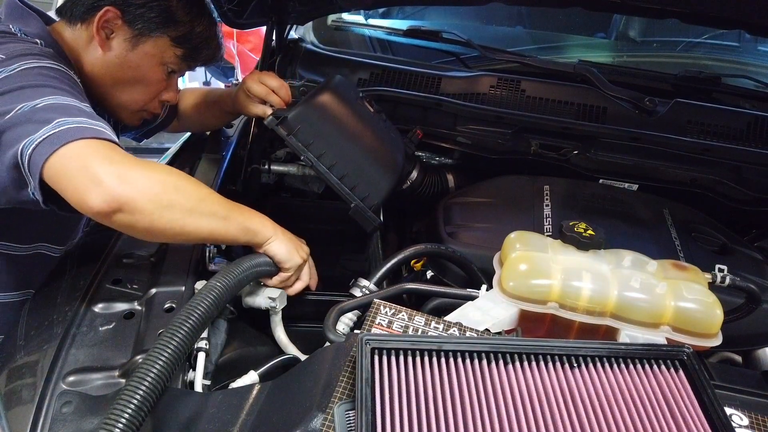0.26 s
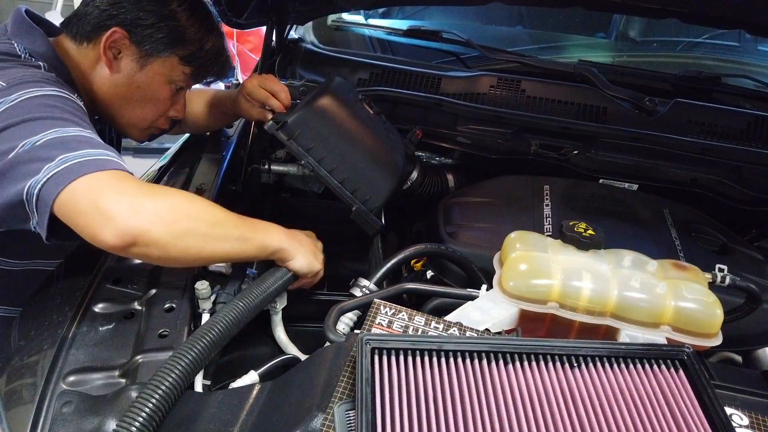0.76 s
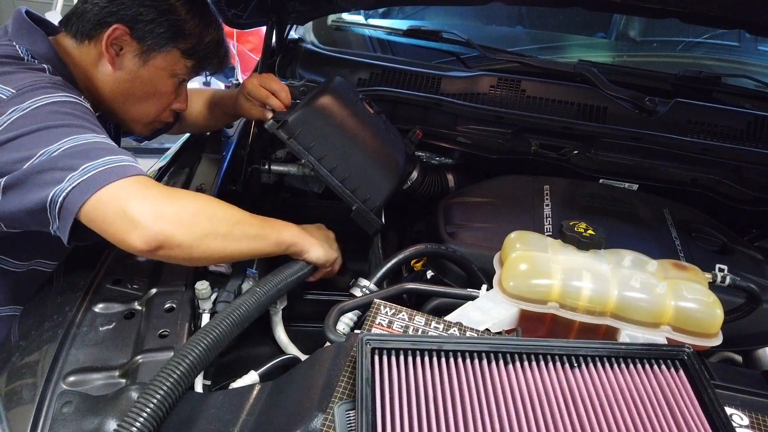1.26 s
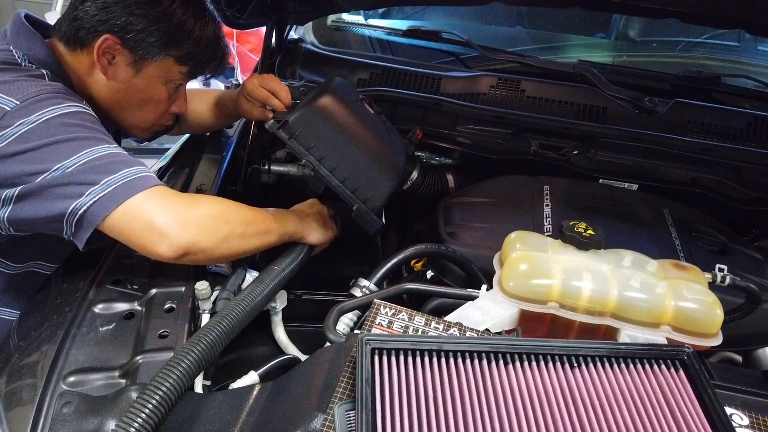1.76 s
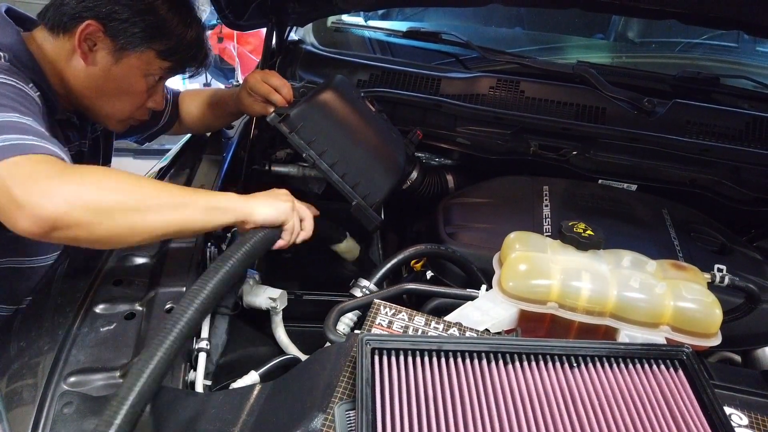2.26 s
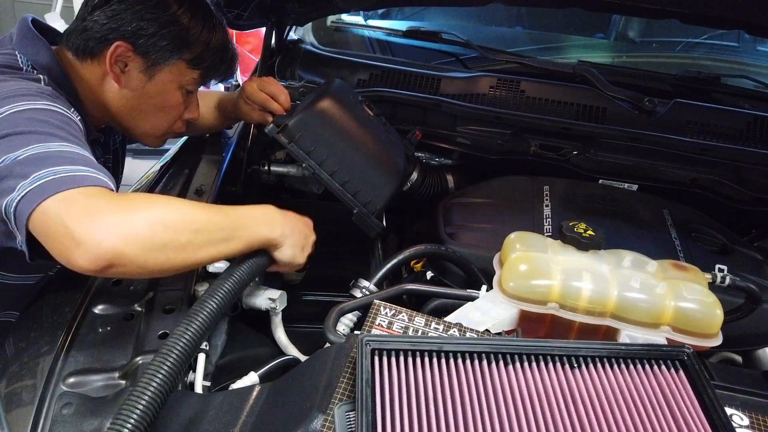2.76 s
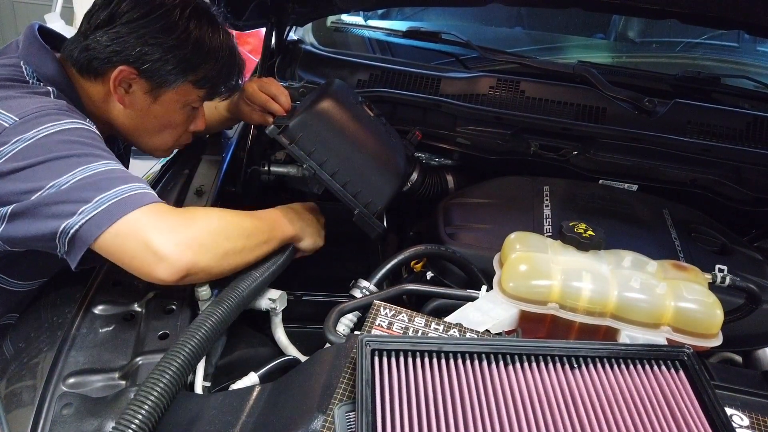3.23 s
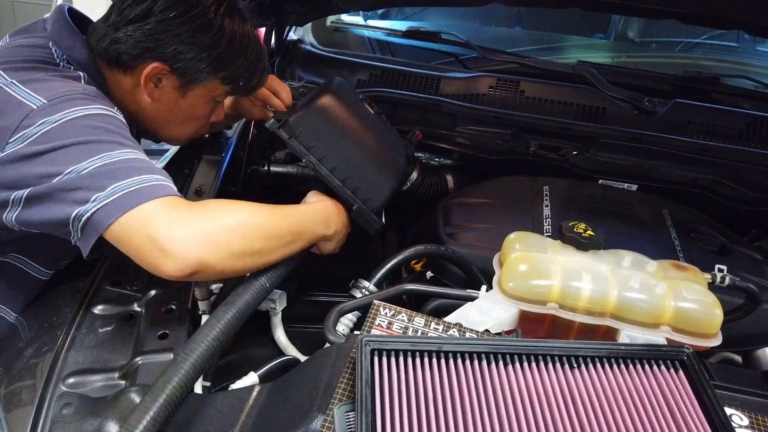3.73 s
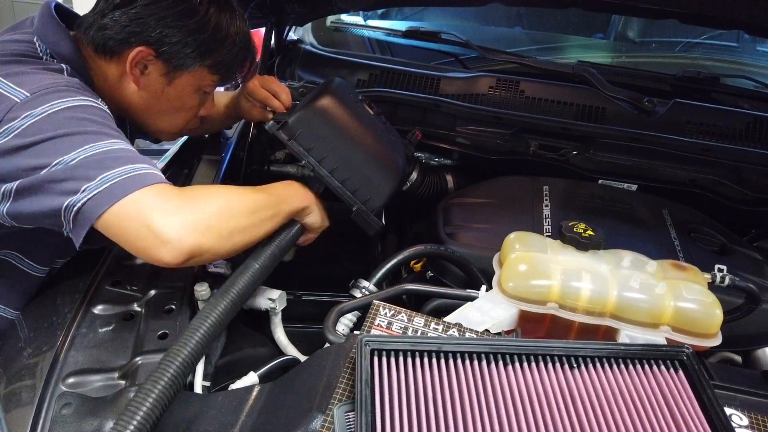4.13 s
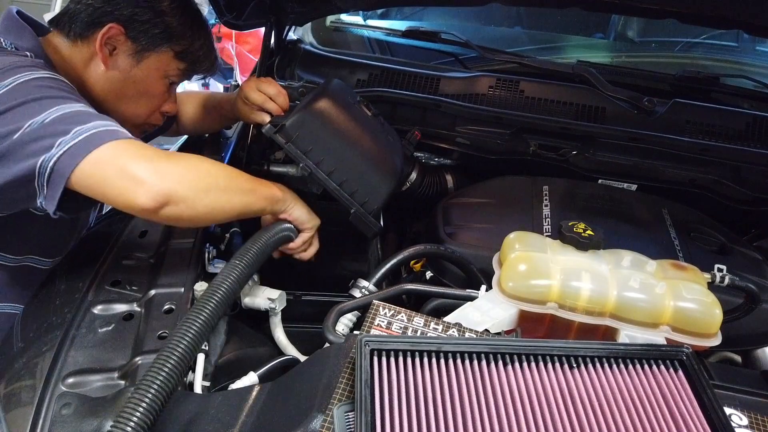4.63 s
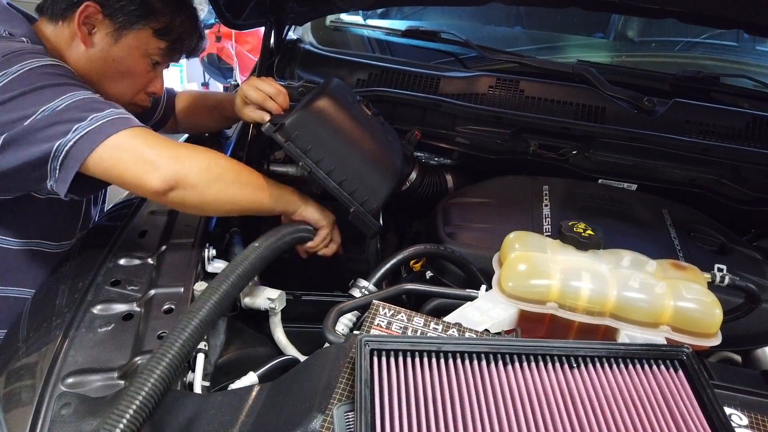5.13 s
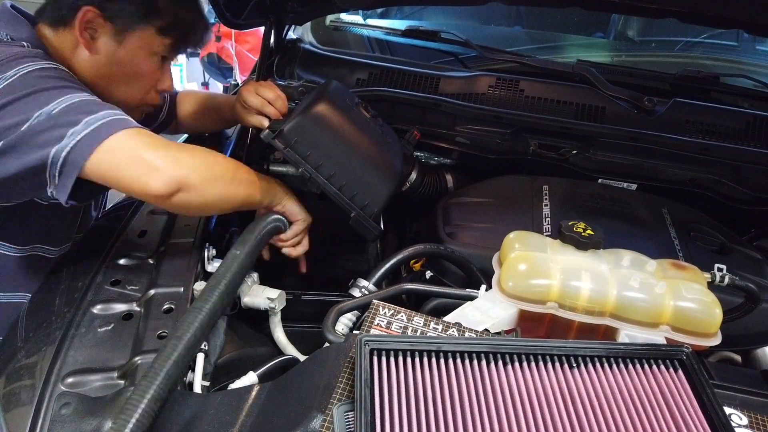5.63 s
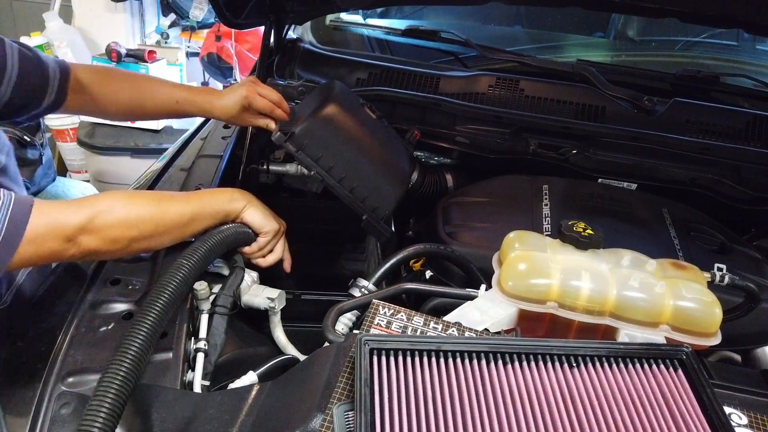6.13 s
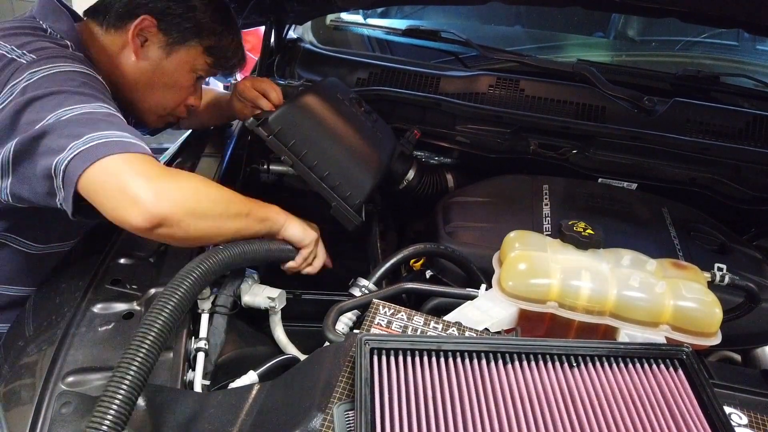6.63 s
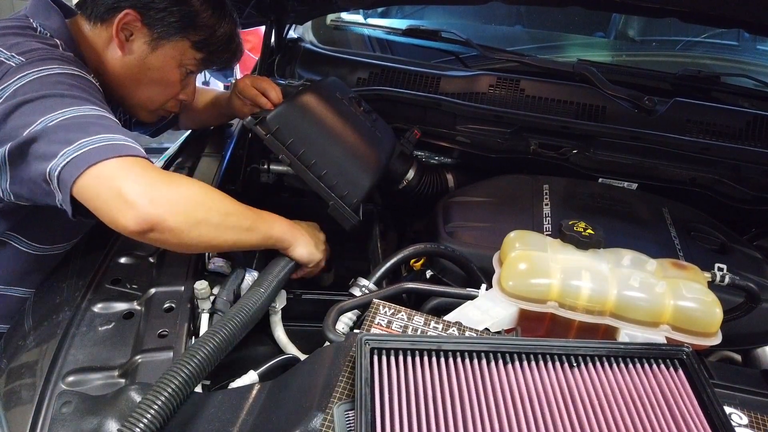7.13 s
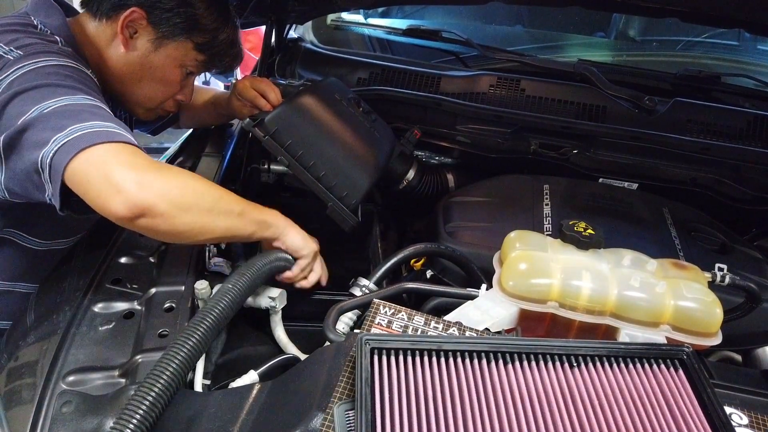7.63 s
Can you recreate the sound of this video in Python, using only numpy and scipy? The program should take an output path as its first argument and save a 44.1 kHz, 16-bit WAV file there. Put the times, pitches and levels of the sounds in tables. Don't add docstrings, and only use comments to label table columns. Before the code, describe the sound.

A vacuum cleaner runs continuously a few metres away, a fixed high whine over roaring air. Close to the microphone, its nozzle knocks and scrapes a hard plastic housing in an engine bay, while sharp hisses and brief airy whistles flare as the gap narrows. The hose rumbles and thumps softly. Handling is busy until about six seconds, pauses, then resumes near the end.

```python
import sys
import numpy as np
from scipy import signal
from scipy.fft import rfft, irfft, next_fast_len
from scipy.io import wavfile
from scipy.ndimage import uniform_filter1d

SR = 44100
rng = np.random.default_rng(int(sys.argv[2]) if len(sys.argv) > 2 else 0)


def natural_amplitude(level_db):
    exponent = np.asarray(level_db, float) / 20
    return 10 ** exponent


def wav_record(signal):
    frames = np.transpose(np.atleast_2d(signal))
    bounded = np.clip(frames, -1, 1)
    quanta = np.round(bounded * 32767).astype(np.int16)
    wavfile.write(sys.argv[1], SR, quanta)


N = 347949
T, M = np.arange(N) / SR, next_fast_len(N)
HZ = np.arange(M // 2 + 1) * SR / M + 1e-3

# start_s, blade_tone_db, nozzle_hiss_db
MACHINE_LEVELS = [(0.0, -27, -36.5), (0.61, -27, -35.5), (1.12, -32.5, -38), (1.38, -33, -39.5),
                  (1.69, -33.5, -33), (1.91, -34, -39), (2.2, -31.5, -40.5), (2.61, -26.5, -37),
                  (2.9, -33.5, -39.5), (3.25, -34.5, -38), (3.67, -30, -39), (3.89, -28.5, -40),
                  (5.1, -29.5, -36.5), (5.36, -32, -38.5), (5.69, -31, -39.5), (6.9, -27.5, -34.5),
                  (7.43, -36.5, -37), (7.89, -33, -41)]
BLADE_HZ = 1875
# pitch_hz, width_hz, level_db
CASING_MODES = [(929, 63, -7.5), (1077, 80, -4), (1204, 105, 0), (1309, 40, 1.5), (1461, 80, -2.5),
                (1693, 18, -1), (1780, 70, 2), (1851, 47, 2.5), (2087, 42, -6), (2330, 55, 1),
                (2522, 95, 1.5), (3116, 200, -6), (3343, 69, 4.5), (3518, 31, 3.5), (3690, 82, -5),
                (4240, 75, -12)]
# pitch_hz, level_db (per Hz)
ROAR_COLOUR = [(600, -27), (1000, -15), (1800, -11), (2000, -11.5), (2700, -4.5), (2920, -13.5),
               (3600, -36), (4500, -43), (6000, -69)]

# pitch_hz, level_db (per Hz)
RUMBLE_COLOUR = [(20, -17), (50, -16.5), (100, -12), (180, -4), (290, -7), (356, -12.5), (500, -5.5),
                 (750, -8), (1000, -17.5), (1300, -34)]
# pitch_hz, width_hz, level_db
HOSE_MODES = [(226, 9.7, 5.6), (439.3, 10.4, 12.2), (539.4, 10.3, 10.5), (650, 57, 5.6), (1010, 20, 4.4)]
# start_s, peak_db, pitch_hz
HOSE_THUMPS = [(0.347, -48, 317), (0.727, -38, 220), (1.127, -32.5, 203), (1.358, -39, 188),
               (1.479, -29.5, 198), (2.099, -36, 258), (2.396, -39, 196), (2.676, -34, 226),
               (2.976, -31.5, 184), (3.19, -29.5, 220), (3.442, -40, 199), (3.695, -36, 167),
               (3.97, -29.5, 199), (4.364, -41, 191), (4.849, -33, 288), (5.049, -28, 280),
               (5.198, -35, 325), (5.459, -29.5, 332), (5.755, -32, 278), (5.886, -31.5, 398),
               (7.219, -40, 153)]
# start_s, length_s, first_hz, last_hz, level_db
RIB_HUMS = [
    (0.026, 0.49, 439.4, 440, -46.5),
    (1.054, 0.19, 302.6, 285, -49.5),
    (1.644, 0.25, 435, 459, -47),
    (4.835, 0.16, 290, 278, -38.5),
    (5.95, 0.44, 194.6, 194, -47.5),
]

# pitch_hz, level_db (per Hz)
HISS_COLOUR = [(2060, -49), (3500, 2), (4230, -7), (4680, -2), (6290, -6.5), (7370, -4.5), (8800, -7.5),
               (12300, -4), (13700, -10), (14500, -4), (15800, -25)]
# pitch_hz, width_hz, level_db
NOZZLE_MODES = [(5660, 280, -0.5), (6060, 48, -6), (7300, 91, 4.5), (7860, 150, 2), (9350, 140, 5),
                (10670, 540, 0), (12400, 130, -16)]
JET_RANGES = [5200, 6600, 8300, 10600, 13200]
# start_s, length_s, level_db, bright_minus_dull_db
SLAP_GUSTS = [(0.116, 0.054, -32.5, 3), (0.627, 0.02, -32, 12), (0.649, 0.074, -36.5, 4),
              (0.945, 0.056, -30, 1.5), (1.105, 0.1, -34.5, 5), (1.233, 0.051, -31, 1),
              (1.452, 0.027, -23.5, 4.5), (1.795, 0.036, -34, 11), (1.833, 0.028, -30, 2),
              (1.905, 0.037, -28, 3), (2.607, 0.035, -28.5, 11), (2.857, 0.044, -33, 4),
              (3.065, 0.06, -32, 1), (3.125, 0.053, -34.5, 5.5), (3.256, 0.1, -35, 5),
              (3.446, 0.025, -30, 2.5), (3.702, 0.036, -28, 1.5), (3.973, 0.091, -28.5, 8),
              (4.108, 0.045, -26.5, 2.5), (4.183, 0.086, -31, 4), (4.483, 0.065, -35.5, 7),
              (5.204, 0.085, -35, 1.5), (5.462, 0.016, -29.5, -7), (5.485, 0.04, -31, 4),
              (6.701, 0.015, -28, -22), (7.043, 0.064, -27, 0.5), (7.102, 0.031, -32, 4),
              (7.136, 0.041, -34, 4), (7.528, 0.15, -33.5, 3.5)]
# start_s, length_s, level_db, bright_minus_dull_db
SLIDE_GUSTS = [(0.758, 0.046, -32, -1), (0.851, 0.022, -30.5, 3), (1.011, 0.069, -31.5, 5),
               (1.331, 0.056, -33.5, 4), (1.508, 0.1, -28, 3.5), (1.625, 0.072, -28, 3),
               (2.35, 0.042, -38.5, -5), (2.501, 0.051, -35, 7), (2.689, 0.07, -30, 2),
               (2.941, 0.015, -30.5, 7), (3.19, 0.05, -35, 5.5), (3.413, 0.028, -28.5, 2.5),
               (3.57, 0.05, -35.5, 8), (4.324, 0.039, -30, 2), (4.426, 0.053, -28, 2.5),
               (4.728, 0.038, -31.5, 33), (5.406, 0.053, -27.5, 4.5), (5.527, 0.016, -29.5, 1),
               (7.18, 0.026, -29.5, 6), (7.294, 0.028, -31, 3), (7.394, 0.044, -31, 1)]
SLAP_PEAK, SLIDE_PEAK = 0.05, 0.55

# start_s, wall_db, lid_db, rim_db, tip_db
NOZZLE_TAPS = [(0.069, -30, -16.5, -24, -20), (0.1232, -23, -33, -26, -31), (0.203, -30, -28, -31, -27),
               (0.509, -21, -38, -21.5, -26), (0.644, -37, -23, -33, -23), (0.67, -32, -20, -22, -19.5),
               (0.6835, -28, -23, -29, -24), (0.6947, -36, -28, -33, -21), (0.7242, -26, -14.5, -33, -29),
               (0.783, -40, -39, -31, -24), (0.798, -36, -39, -38, -22), (0.8571, -37, -21, -34, -30),
               (1.1124, -19, -15.5, -22.5, -32), (1.188, -28, -26, -39, -30), (1.2176, -28, -34, -28, -25),
               (1.2427, -27, -14.5, -24, -21), (1.2684, -25, -30, -27, -30), (1.3337, -28, -33, -37, -27),
               (1.364, -20.5, -29, -27, -25), (1.4577, -44, -25, -29, -26), (1.5139, -36, -31, -29, -19),
               (1.638, -40, -33, -24, -31), (1.7367, -43, -33, -36, -30), (1.8001, -40, -27, -16, -12.5),
               (2.2463, -22, -32, -32, -41), (2.276, -28, -28, -34, -36), (2.6394, -33, -42, -31, -33),
               (2.677, -37, -26, -40, -43), (2.6968, -22, -21, -18, -23), (2.8615, -15.5, -30, -19.5, -20),
               (2.8685, -22, -23, -37, -26), (3.0003, -27, -25, -35, -31), (3.111, -24.5, -32, -43, -35),
               (3.348, -27, -33, -40, -33), (3.427, -41, -46, -31, -28), (3.6529, -30, -28, -25, -25),
               (4.113, -22, -35, -30, -36), (4.1913, -27, -27, -26, -26), (4.3326, -29, -18, -32, -43),
               (4.3646, -27, -14, -28, -26),
               (4.4177, -32, -22, -32, -24), (4.4404, -42, -26, -41, -22), (4.4535, -42, -40, -40, -22),
             (4.494, -23, -27, -26, -16), (4.5649, -45, -32, -26.5, -23), (4.6873, -33, -31, -28, -28),
             (4.7361, -22, -38, -41, -37), (4.8413, -42, -27, -25, -27), (5.0469, -32, -24, -26, -26),
             (5.0584, -41, -29, -30, -32), (5.122, -33, -34, -37, -26), (5.1524, -19, -31, -16, -17),
             (5.1614, -30, -35, -21, -24), (5.1978, -39, -21, -25, -20.5), (5.4193, -25, -33, -26, -25),
             (5.4452, -21, -24, -25, -23), (5.4552, -28, -21, -31, -30), (5.4726, -20, -26, -25, -27),
             (5.4934, -30, -36, -29, -25), (5.5036, -33, -28, -38, -33), (5.5159, -26, -32, -32, -25),
             (5.5343, -36, -23, -34, -36), (5.8459, -23, -22, -23, -27), (5.88, -30, -35, -34, -26),
             (5.9483, -30, -31, -29, -26), (6.7032, -31, -33, -25, -24), (6.7642, -36, -27, -29, -29),
             (6.8884, -25, -29, -20.5, -20), (7.0476, -27, -30, -24, -26), (7.0569, -26, -33, -31, -26),
             (7.115, -21, -27, -25, -23), (7.1471, -30, -21, -27, -25), (7.1837, -24, -20.5, -27, -23),
             (7.2317, -32, -19.5, -35, -27), (7.2582, -41, -21, -42, -41), (7.4044, -49, -34, -41, -26),
             (7.4223, -47, -46, -43, -29), (7.6599, -37, -14.5, -21, -23), (7.6676, -25, -23, -24, -33),
             (7.8028, -44, -22, -30, -25),
               (0.6365, -34, -26, -28, -27), (1.2365, -24, -22, -32, -23), (1.437, -25, -32, -35, -36),
                 (1.8442, -36, -34, -25, -29), (2.5471, -36, -26, -31, -37), (2.611, -26, -34, -36, -33),
                 (3.1906, -38, -36, -32.5, -25), (3.701, -32, -32, -26, -33), (4.3085, -26, -24, -38, -38),
                 (4.36, -32, -20, -25, -34), (4.4054, -35, -27, -32, -36), (7.7458, -34, -36, -27, -30),
                 (7.881, -38, -36, -32.5, -29)]
# start_s, peak_db
BOX_KNOCKS = [(0.6696, -24), (0.6835, -33), (0.6947, -41), (1.1124, -38), (1.2422, -42), (1.4577, -31),
              (1.6373, -37), (1.8005, -32), (2.2471, -33), (2.2755, -42), (2.6405, -26), (2.6968, -24.5),
              (2.8616, -45), (3.3473, -31.5), (4.494, -32), (4.5649, -36), (4.8413, -22), (5.0469, -27),
              (5.0584, -31), (5.1614, -27.5), (5.4726, -36), (5.8459, -27.5), (5.88, -33), (5.9483, -28),
              (6.8884, -34), (7.0476, -30), (7.0569, -33), (7.115, -30), (7.6599, -32), (7.6676, -36),
              (7.8028, -31)]
# pitch_hz, level_db, fade_by_60_db_s
BOOM_MODES = [(580, -12, 0.05), (766, -9, 0.05), (940, -4, 0.045)]
# pitch_hz, level_db, fade_by_60_db_s
WALL_MODES = [(1284, -18, 0.05), (1500, -11, 0.045), (1640, -4, 0.055)]
# pitch_hz, level_db, fade_by_60_db_s
LID_MODES = [(2070, -9, .02), (2350, -6, .02), (2560, 1, .03)]
# pitch_hz, level_db, fade_by_60_db_s
RIM_MODES = [(3110, 0, .013), (3500, 1, .014), (3850, 1, .013), (4300, -2, .011)]
# pitch_hz, level_db, fade_by_60_db_s
TIP_MODES = [(4800, -5, .009), (5300, -1, .011), (5750, 2, .013), (6300, -4, .008), (7300, -7, .006),
             (9500, -9, .004), (12000, -11, .003)]
RATTLE_S = 0.0045

# start_s, length_s, pitch_hz, level_db
GAP_WHISTLES = [(0.123, 0.073, 13400, -31), (0.762, 0.047, 5100, -29), (0.855, 0.025, 8120, -43),
                (0.943, 0.048, 11000, -33), (1.02, 0.068, 10650, -38), (1.23, 0.056, 7880, -43),
                (1.33, 0.061, 5760, -38), (1.453, 0.036, 12350, -37), (1.63, 0.096, 10810, -31),
                (1.795, 0.024, 9900, -31), (1.907, 0.037, 12270, -38), (2.509, 0.047, 10800, -33),
                (2.609, 0.049, 11670, -32), (2.695, 0.072, 10640, -33), (2.857, 0.051, 11000, -39),
                (3.05, 0.069, 8000, -34), (3.188, 0.026, 10510, -34), (3.261, 0.062, 10910, -40),
                (3.577, 0.049, 13160, -40), (3.697, 0.046, 10200, -26), (4.106, 0.05, 10300, -29.5),
                (4.187, 0.07, 5400, -36), (4.327, 0.046, 8300, -36), (4.43, 0.048, 5580, -28.5),
                (4.489, 0.022, 5680, -35), (5.418, 0.048, 5760, -32), (5.645, 0.023, 12500, -34),
                (6.958, 0.049, 7960, -33.5), (7.141, 0.023, 12250, -39), (7.3, 0.026, 10730, -40),
                (7.401, 0.035, 5640, -34), (7.656, 0.027, 5800, -35)]
WHISTLE_WIDTH = 0.047
# start_s, length_s, level_db, wall_against_lid_db
RIB_SCRAPES = [(0.653, 0.083, -29.5, 1), (1.175, 0.14, -33.5, 7), (1.433, 0.034, -32, 10),
               (2.228, 0.093, -38, -7), (2.619, 0.12, -33, -6), (4.076, 0.05, -34.5, 2),
               (4.3, 0.24, -42.5, -21), (4.716, 0.063, -32, 18), (5.035, 0.053, -29, 1),
               (5.426, 0.098, -29.5, 7), (5.84, 0.18, -34.5, 1), (7.046, 0.27, -37, 22),
               (7.792, 0.072, -34.5, 6)]
# pitch_hz, side_minus_mid_db
PORT_DIFFERENCE = [(30, -1), (60, -5), (125, -6), (300, -9), (480, -18), (700, -34), (1600, -30),
                   (1870, -15), (2200, -28), (6300, -24), (8500, -10), (12500, -3), (15000, -3)]


def curve(points):
    hz, db = np.transpose(points)
    return natural_amplitude(np.interp(np.log(HZ), np.log(hz), db))


def peaks(modes):
    return np.sqrt(sum(natural_amplitude(2 * db) / (1 + (2 * (HZ - hz) / width) ** 2) ** 2 for hz, width, db in modes))


def air(gain, lo_hz, hi_hz):
    power = np.sum(gain[(HZ > lo_hz) & (HZ < hi_hz)] ** 2) * 4 / M ** 2
    chance = rng.standard_normal((2, len(HZ), 2)).view(complex)[..., 0]
    return irfft(chance * gain, M)[:, :N] / np.sqrt(power)


def walk(rate):
    k = int(SR / rate)
    held = np.repeat(rng.standard_normal(N // k + 1), k)
    return 1.247 * uniform_filter1d(uniform_filter1d(held, k), k)[:N]


def add(out, s, sound):
    i = max(int(s * SR), 0)
    out[..., i:i + sound.shape[-1]] += sound[..., :N - i]


def fan(tone_db, shade_db):
    quarter_turn = np.array([[0], [np.pi / 2]])
    phase = 2 * np.pi * np.cumsum(BLADE_HZ + 1.553 * walk(7.2)) / SR + quarter_turn
    tone = natural_amplitude(1.6 * walk(55)) * np.sin(phase) + natural_amplitude(-24) * np.sin(2 * phase)
    colour = np.hypot(curve(ROAR_COLOUR), peaks(CASING_MODES))
    lower = air(colour * (HZ < 2200), 1106, 1425) * natural_amplitude(-5.0 + 2.0 * walk(22))
    middle = air(colour * (HZ > 2200) * (HZ < 2900), 2200, 3700) * natural_amplitude(-6.5 + 1.2 * walk(16))
    upper = air(colour * (HZ > 2900), 2200, 3600) * natural_amplitude(-6.0 + 2.05 * walk(17))
    return np.sqrt(2) * natural_amplitude(tone_db) * tone + natural_amplitude(shade_db) * (lower + middle + upper)


def hose(rumble_db):
    colour = curve(RUMBLE_COLOUR) * np.hypot(1, peaks(HOSE_MODES))
    out = air(colour, 110, 655) * natural_amplitude(rumble_db + 3.0 + 2.0 * walk(6.5))
    t = np.arange(int(.15 * SR)) / SR
    no_bass = signal.butter(2, 130, "high", fs=SR, output="sos")
    for s, db, hz in HOSE_THUMPS:
        push = rng.standard_normal((2, len(t))) * t * np.exp(-t / 0.021)
        body = np.exp(-t / .0022) * np.sin(2 * np.pi * hz * t)
        bump = signal.sosfilt(no_bass, signal.fftconvolve(push, body[None], axes=1))
        add(out, s - .015, natural_amplitude(db - 2.5) * bump / np.abs(bump[0]).max())
    for start, length, first_hz, last_hz, top_db in RIB_HUMS:
        s = start + length * np.array([0, 0.44, 1])
        db = top_db - 5 * np.array([1, 0, 1])
        t = np.arange(s[0] - .02, s[-1] + .03, 1 / SR)
        fade = np.interp(t, [s[0] - .02, s[0], s[-1], s[-1] + 0.019], [0, 1, 1, 0])
        hz = np.interp(t, s[::2], [first_hz, last_hz]) + 13 * walk(41.5)[:len(t)]
        phase = 2 * np.pi * np.cumsum(hz) / SR
        level = natural_amplitude(np.interp(t, s, db) + 1.4 * walk(53)[:len(t)])
        add(out[0], t[0], np.sqrt(2) * fade * level * np.sin(phase))
    return out


def nozzle(bed_db):
    colour = curve(HISS_COLOUR) * np.hypot(1, peaks(NOZZLE_MODES))
    count = len(JET_RANGES)
    octave = np.log2(np.array(JET_RANGES) / 8300)
    gust = np.zeros((count, N))
    puffs = [(*row, SLAP_PEAK) for row in SLAP_GUSTS] + [(*row, SLIDE_PEAK) for row in SLIDE_GUSTS]
    for s, length, db, bright_db, place in puffs:
        t = np.arange(int((length + 0.046) * SR)) / SR
        times = [0, .002, 0.0009 + length * place, length + 0.0011, length + 0.0016, length + 0.045]
        shape = np.interp(t, times, [0.26 * (1 - place), 1.7 * (1 - place), 1.72, 0.43, 0.0, 0.14])
        stray_db = 1.5 * rng.standard_normal(count)
        share = natural_amplitude(-14 * (octave - bright_db / 12) ** 2 + stray_db)
        add(gust, s + 0.0054, shape * natural_amplitude(db - 2.5) * share[:, None] / np.linalg.norm(share))
    softer_top = curve([(20, 0), (13500, 0), (14500, -4), (20000, -6)])
    out = air(colour * softer_top, 6100, 15000) * natural_amplitude(bed_db - 1.5 + 1.3 * walk(10))
    grains = np.repeat(rng.exponential(size=N // 32 + 1) - 1, 32)[:N]
    for hz, level in zip(JET_RANGES, gust):
        grit = natural_amplitude(2.3 * np.minimum(grains, 3) + 1.8 * walk(70))
        one_range = np.exp(-(np.log2(HZ / hz) / .2) ** 2)
        out += level * grit * air(colour * one_range, 0, SR)
    return out


def ring(modes, t, chance):
    hz, db, t60 = np.transpose(modes)[..., None]
    k = len(modes)
    onset = 1 - np.exp(-t * hz / .8)
    size = natural_amplitude(db + 2.2 * chance[:k, None]) / np.sqrt(k) * onset
    tone = np.sin(2 * np.pi * hz * (1 + 0.012 * chance[-k:, None]) * t)
    return np.sum(size * np.exp(-np.log(1000) * t / t60) * tone, axis=0)


def strike(modes, push, t, chance):
    hit = signal.fftconvolve(push, ring(modes, t, chance)[None], axes=1)[:, :len(t)]
    return hit / np.abs(hit[0]).max()


def taps():
    out, t = np.zeros((2, N)), np.arange(int(.07 * SR)) / SR
    fade = np.cos(np.pi / 2 * t / t[-1])
    for s, wall_db, lid_db, rim_db, tip_db in NOZZLE_TAPS:
        chance = rng.standard_normal((4, 14))
        rattle = np.exp(-t / RATTLE_S) * natural_amplitude(5.5 * rng.standard_normal(len(t)))
        push = (np.exp(-t / .0006) + .13 * rattle) * rng.standard_normal((2, len(t)))
        push[:, 0] += 3
        hit = natural_amplitude(wall_db + 2.0) * strike(WALL_MODES, push, t, chance[0])
        hit += natural_amplitude(lid_db + 3.0) * strike(LID_MODES, push, t, chance[1])
        hit += natural_amplitude(rim_db + 8.5) * strike(RIM_MODES, push, t, chance[2])
        hit += natural_amplitude(tip_db + 5.5) * strike(TIP_MODES, push, t, chance[3])
        crack = natural_amplitude(-8) * (push - uniform_filter1d(push, size=15)) / np.abs(push[0]).max()
        add(out, s - 0.0003, fade * (hit + natural_amplitude(max(rim_db, tip_db) + 9.0) * crack))
    for s, db in BOX_KNOCKS:
        push = np.exp(-t / .004) * rng.standard_normal((2, len(t)))
        boom = strike(BOOM_MODES, push, t, rng.standard_normal(14))
        add(out, s, natural_amplitude(db + 1.0) * fade * boom)
    return out


def whistles():
    out = np.zeros((2, N))
    for s, length, hz, db in GAP_WHISTLES:
        n = int((length + 0.0091) * SR)
        limits = [hz * (1 - WHISTLE_WIDTH), hz * (1 + WHISTLE_WIDTH)]
        band = signal.butter(2, limits, "band", fs=SR, output="sos")
        gritty = rng.standard_normal((2, 8192)) * natural_amplitude(4.0 * rng.standard_normal(8192))
        jet = signal.sosfilt(band, gritty)[:, -n:]
        add(out, s - .005, natural_amplitude(db - 0.5) * np.hanning(n) ** 0.53 * jet / jet.std())
    return out


def scrapes():
    out, t = np.zeros((2, N)), np.arange(int(.06 * SR)) / SR
    for s, length, db, wall_db in RIB_SCRAPES:
        chance = rng.standard_normal((3, 14))
        box = ring(LID_MODES, t, chance[0]) + natural_amplitude(3.0) * ring(RIM_MODES, t, chance[0, ::-1])
        box += natural_amplitude(wall_db) * ring(WALL_MODES, t, chance[1])
        box += natural_amplitude(-1.0) * ring(BOOM_MODES, t, chance[2]) + natural_amplitude(-5.0) * ring(TIP_MODES, t, chance[2])
        n = int(length * SR)
        slips = rng.standard_normal((2, n)) * (rng.random(n) < .012) * np.sqrt(np.hanning(n))
        drag = signal.fftconvolve(slips, box[None], axes=1)
        add(out, s, natural_amplitude(db) * drag / drag[0, :n].std())
    return out


def scene():
    s, *columns = np.transpose(MACHINE_LEVELS)
    tone_db, hiss_db = (np.interp(T, s, c) for c in columns)
    shade_db = uniform_filter1d(tone_db, int(.2 * SR)) + 30.0
    machine = fan(tone_db, 0.67 * shade_db - 32.5) + hose(0.7 * shade_db - 50.5)
    no_bass = signal.butter(4, 600, "high", fs=SR, output="sos")
    mid, side = machine + nozzle(hiss_db) + whistles() + signal.sosfilt(no_bass, taps() + scrapes())
    side = irfft(rfft(side, M) * curve(PORT_DIFFERENCE), M)[:N]
    return np.array([mid + side, mid - side])


def low_pass(x):
    return signal.sosfilt(signal.butter(12, 15850, fs=SR, output="sos"), x)


def record(dry):
    dry = signal.sosfilt(signal.butter(1, 70, "high", fs=SR, output="sos"), dry)
    dry = .62 * np.tanh(dry / .62)
    dry = signal.sosfilt(signal.ellip(10, .2, 70, 15850, fs=SR, output="sos"), dry)
    return low_pass(dry)


dry = scene()
out = record(dry)
wav_record(out)
```